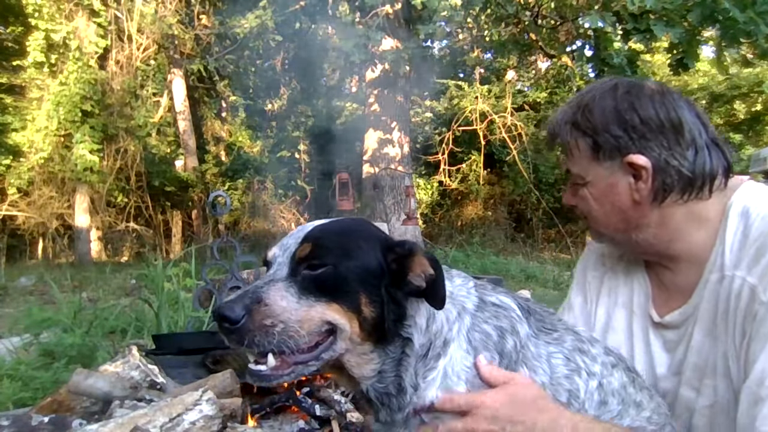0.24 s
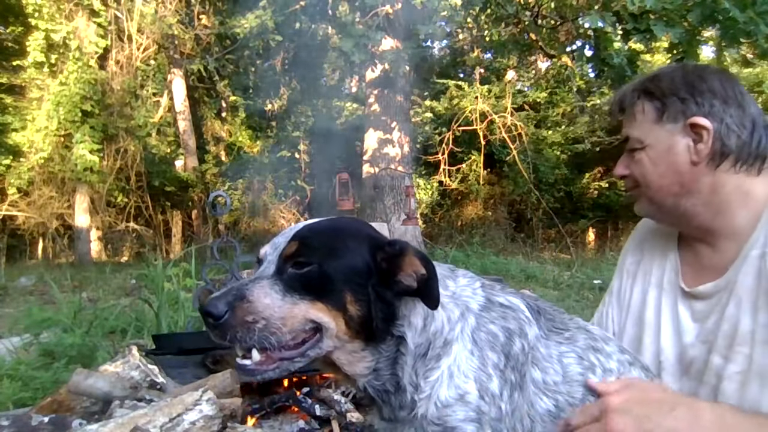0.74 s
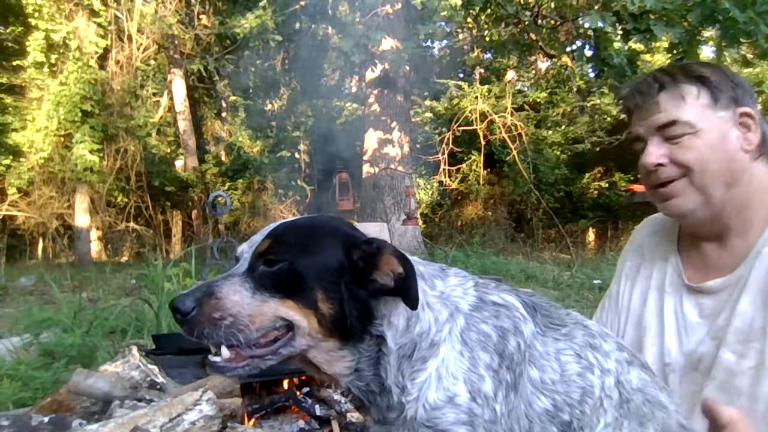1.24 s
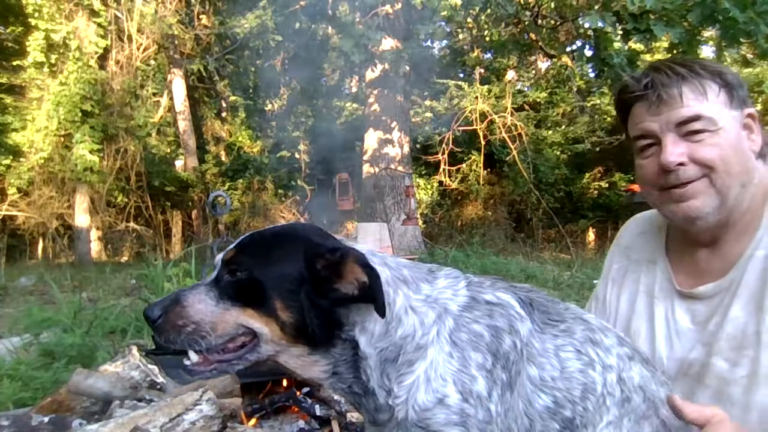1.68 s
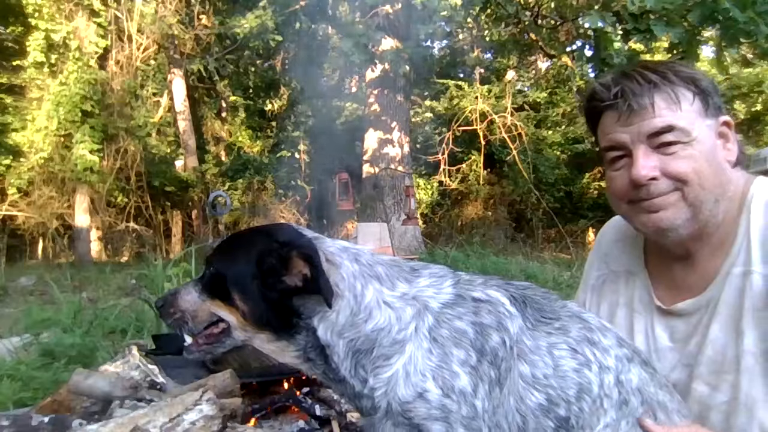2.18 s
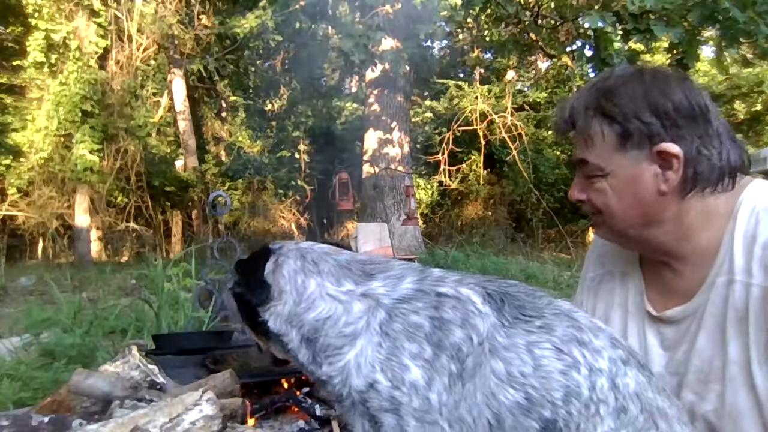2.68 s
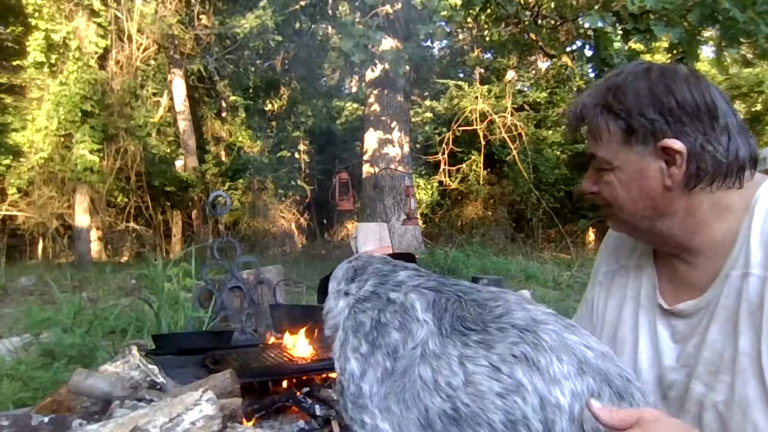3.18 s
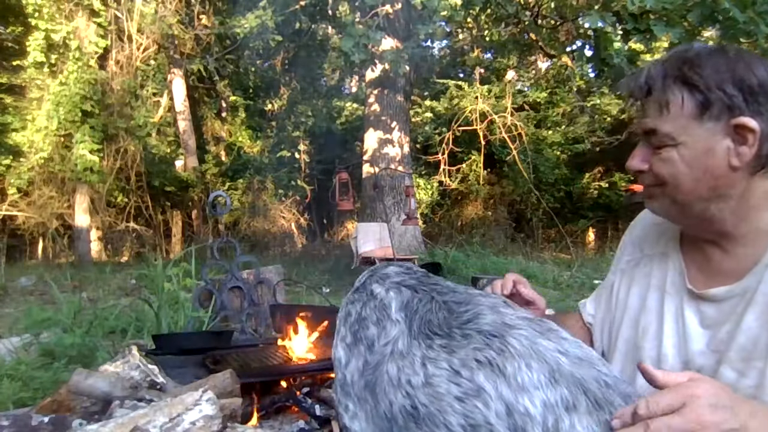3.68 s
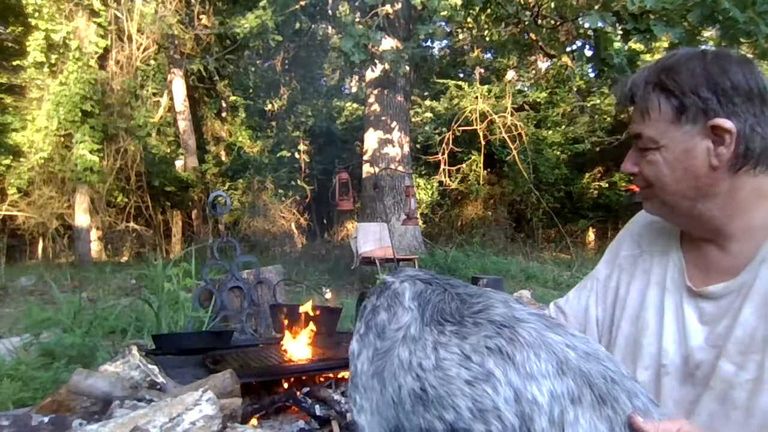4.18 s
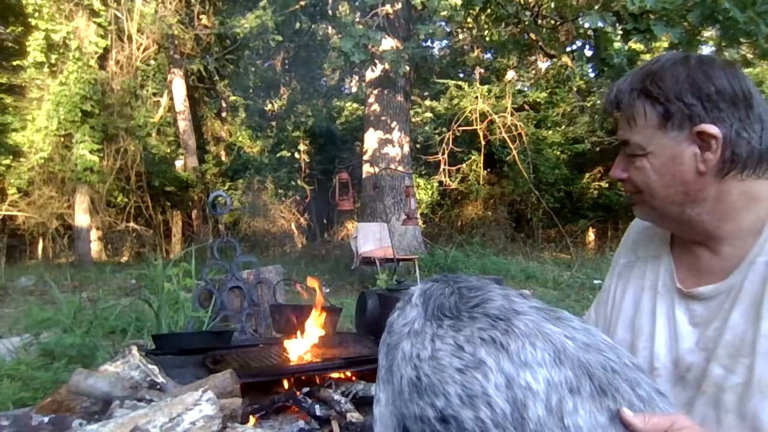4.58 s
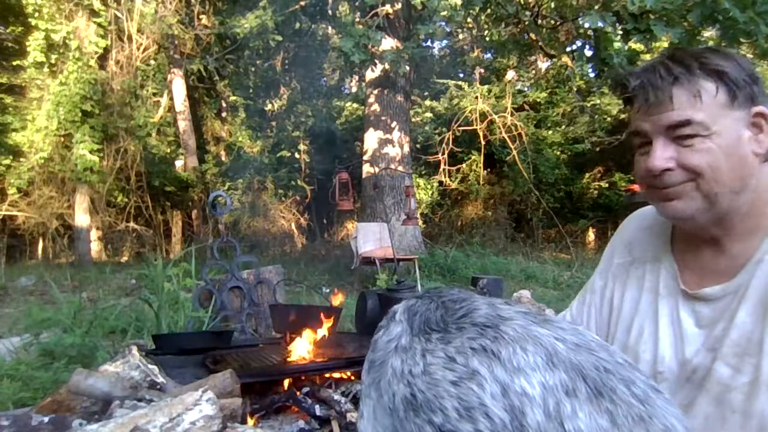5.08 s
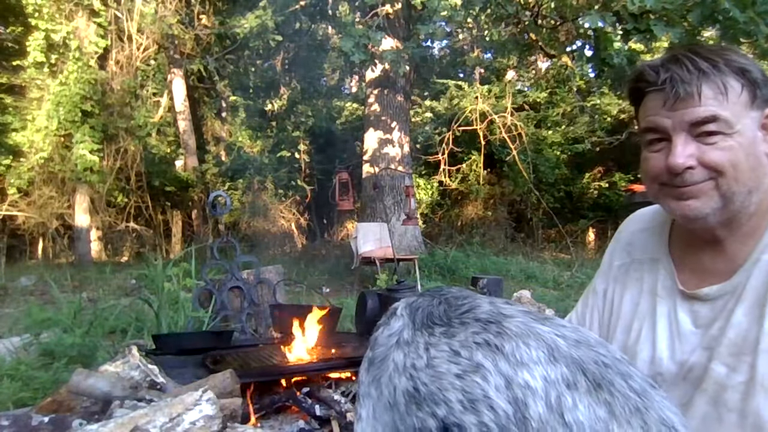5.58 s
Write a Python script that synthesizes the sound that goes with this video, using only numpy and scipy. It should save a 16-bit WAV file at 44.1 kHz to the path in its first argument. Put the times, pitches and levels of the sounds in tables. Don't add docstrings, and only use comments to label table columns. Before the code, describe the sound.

Close stereo pickup beside a small wood fire at the edge of trees. Continuous cricket hiss and fast pulsing insect buzz fill the top. Sparse snaps grow into a cluster of strong crackles, with fur and cloth rustling softly. Then comes a faint, wavering, echoing howl from far off, with one short hoarse bark, a sharp exploding pop, and another hoarse bark. Small crackles continue to the end.

```python
import sys
import numpy as np
from scipy import signal
from scipy.io import wavfile
from scipy.ndimage import uniform_filter1d

SR = 44100
rng = np.random.default_rng(int(sys.argv[2]) if len(sys.argv) > 2 else 0)


def undo_db(level):
    steps = np.asarray(level, float) / 20
    return 10 ** steps


def put_to_file(sound):
    columns = np.atleast_2d(sound).T
    safe = np.clip(columns, -1, 1)
    whole_steps = np.round(safe * 32767)
    wavfile.write(sys.argv[1], SR, whole_steps.astype(np.int16))


N = 257540
TIME = np.arange(N) / SR


def evened(x):
    return x / np.sqrt(np.mean(x ** 2) + 1e-20)


def read(points, hz):
    f, value = np.transpose(points)
    return np.interp(np.log(hz + 1), np.log(f + 1), value)


def over_time(points):
    return np.interp(TIME, *np.transpose(points))


def add(mix, start_s, sound):
    part = mix[..., round(start_s * SR):][..., :sound.shape[-1]]
    part += sound[..., :part.shape[-1]]


def resonate(x, hz, width_hz):
    turn = np.exp(2j * np.pi * hz * np.arange(x.shape[-1]) / SR)
    r = np.exp(-np.pi * width_hz / SR)
    smooth = signal.lfilter([(1 - r) ** 2], [1, -2 * r, r * r], x / turn)
    return 2 * (turn * smooth).real


def wander(count, rate_hz):
    size = max(int(SR / rate_hz), 2)
    once = uniform_filter1d(rng.standard_normal(count), size)
    return evened(uniform_filter1d(once, size))


def placed(x, lag, pan_db):
    return np.array([x, np.roll(x, lag)]) * undo_db(np.array([[pan_db / 2], [-pan_db / 2]]))


# pitch in Hz, likeness (1 is identical).
LIKENESS = [(30, .88), (80, .93), (200, .96), (500, .85), (1000, .6), (2400, 0), (8000, .1), (15000, .28)]


def noise(colour, patchy_db, size=512):
    frames, hz = 4 * N // size + 5, np.fft.rfftfreq(size, 1 / SR)
    a, b, c, d, patches = rng.standard_normal((frames, len(hz), 5)).T
    patches = uniform_filter1d(patches, 12, 0)
    patches = evened(uniform_filter1d(patches, 14, 1))
    same = np.clip(read(LIKENESS, hz), -1, 1)[:, None]
    left = a + 1j * b
    right = same * left + np.sqrt(1 - same ** 2) * (c + 1j * d)
    z = np.array([left, right]) * undo_db(read(colour, hz)[:, None] + patchy_db * patches)
    return evened(signal.istft(z, nperseg=size, noverlap=3 * size // 4)[1][:, :N])


def trees(x, decays, gap_s):
    hz, t, z = signal.stft(rng.standard_normal((2, 2 * SR)), SR, nperseg=256)
    fading = z * undo_db(-60 * t / read(decays, hz)[:, None])
    tail = signal.istft(fading, SR, nperseg=256)[1]
    tail = tail * np.clip(np.arange(tail.shape[1]) / SR / gap_s, 0, 1)
    low_pass = signal.butter(2, 1500, fs=SR, output="sos")
    tail[1] += 0.9 * signal.sosfilt(low_pass, tail[0] - tail[1])
    return signal.fftconvolve(x[None], tail / np.linalg.norm(tail[0]), axes=1)[:, :N]


def cycles(hz, jitter):
    return np.cumsum(hz * (1 + jitter * wander(len(hz), 90))) / SR


def voice(turns, levels_db, shimmer_db, fade):
    out = np.zeros(len(turns))
    for k, level_db in enumerate(levels_db, 1):
        strength = np.sqrt(2) * undo_db(level_db + shimmer_db * wander(len(turns), 84))
        out += strength * np.cos(2 * np.pi * k * turns)
    return out * signal.windows.tukey(len(turns), fade)


# pitch in Hz, level in dB per Hz.
FLAME_COLOUR = [(12, -34), (20, 4), (146, -0.5), (460, -13), (518, -13.5), (718, -20), (867, -19),
                (1200, -26), (1560, -56), (2640, -120)]


def flames():
    steady_db, gust_db, gust_s, gust_width_s = -59.5, 9, 1.917, 0.15
    gust = np.exp(-((TIME - gust_s) / gust_width_s) ** 2)
    lumps_db = 2.6 * wander(N, 30)
    level_db = steady_db + gust_db * gust + lumps_db
    return undo_db(level_db) * noise(FLAME_COLOUR, patchy_db=-2.0, size=2048)


# pitch in Hz, level in dB per Hz.
AIR_COLOUR = [(250, -36), (500, -9), (1000, -7.5), (2500, -6.5), (4000, -1.5), (5500, 2.5), (8500, -5),
              (10000, -6), (12500, -5), (15700, -11.5), (16050, -35)]


def air():
    level_db = -60 + 0.98 * wander(N, 2.2)
    return undo_db(level_db) * noise(AIR_COLOUR, patchy_db=0.5)


# time in seconds, level in dB.
CRICKET_LEVEL = [(0.0, -54.5), (0.5, -53.5), (3.59, -53), (4.83, -54), (5.84, -53)]
# pitch in Hz, width in Hz, level in dB.
CRICKET_WINGS = [(6673, 370, -7.5), (6985, 260, -6.5), (7170, 1000, -5)]


def crickets():
    clicks_per_s = 2500
    struck = rng.random((2, N)) < clicks_per_s / SR
    size = undo_db(3.5 * rng.exponential(1, (2, N)).clip(0, 4))
    teeth = struck * size * rng.choice([-1., 1.], (2, N))
    chorus = evened(sum(undo_db(db) * resonate(teeth, hz, width) for hz, width, db in CRICKET_WINGS))
    level_db = over_time(CRICKET_LEVEL) + 0.69 * wander(N, 7.7)
    return undo_db(level_db) * (chorus + 0.059 * chorus[::-1])


# time in seconds, level in dB.
BUZZ_LEVEL = [(0.1, -65), (0.7, -58.5), (2.8, -61.5), (4.0, -58.5), (5.84, -59)]
# pitch in Hz, level in dB per Hz.
BUZZ_COLOUR = [(8000, -25.5), (11000, -14), (13000, -4.5), (14500, 1.5), (15700, 3), (16050, -32.5)]
# share of the stroke done (0 to 1), level in dB.
WING_STROKE = [(0, 0), (.16, .5), (.26, -6.5), (.5, -7), (.7, -3), (1, 0)]


def bush_cricket():
    first_stroke, strokes_per_s, tiring_per_s2 = .25, 24.17, .166
    stroke = (first_stroke + strokes_per_s * TIME - tiring_per_s2 * TIME ** 2 / 2) % 1
    level_db = over_time(BUZZ_LEVEL) + np.interp(stroke, *np.transpose(WING_STROKE))
    return undo_db(level_db + 6.0) * noise(BUZZ_COLOUR, patchy_db=1.9, size=256)


# start in seconds, length in seconds, level in dB, centre in Hz.
RUSTLES = [(0.262, 0.055, -60.5, 640), (0.515, 0.051, -64.5, 815), (1.173, 0.047, -55, 2330),
           (1.77, 0.033, -42.5, 1389), (1.8, 0.034, -55, 1600), (1.885, 0.094, -58.5, 780),
           (1.99, 0.041, -53, 1600), (2.368, 0.1, -59, 990), (2.653, 0.1, -56.5, 1790),
           (2.658, 0.069, -58.5, 457), (3.449, 0.062, -62.5, 3000), (5.536, 0.036, -62, 3000),
           (5.804, 0.043, -63, 2520)]
# start in seconds, level in dB.
FLAME_PUFFS = [(0.41, -58.5), (1.896, -41.5), (2, -44.5), (2.093, -58), (3.968, -54), (5.3, -63)]


def rustles():
    out = np.zeros(N)
    puff_s, puff_hz = 0.06, 200
    low_puffs = [(start_s, puff_s, db, puff_hz) for start_s, db in FLAME_PUFFS]
    for start_s, length_s, db, hz in list(RUSTLES) + low_puffs:
        puff = evened(resonate(rng.standard_normal(4 * 2048), hz, 1.1 * hz))
        puff = puff[:round(length_s * SR)]
        add(out, start_s, undo_db(db) * puff * np.hanning(len(puff)))
    return placed(out, lag=2, pan_db=-2.0)


# start in seconds, knock in dB, crunch in dB, snap over the crunch in dB.
CRACKLES = [(0.5027, -66, -50, 18), (.759, -54, -40.5, 8), (.96, -58, -49, 7), (1.198, -34.5, -55.5, 25.5),
            (1.3471, -25, -24.5, 2), (1.5006, -38, -20.5, 1.5), (1.585, -17, -18.5, 7.5),
            (1.621, -64, -61, 17), (1.657, -57, -42.5, 14), (1.795, -13.5, -16, 2.5), (1.888, -61, -46, 7),
            (1.995, -17, -22.5, 3), (2.517, -42.5, -36.5, 1.5), (3.271, -44.5, -26.5, 6.5),
            (3.954, -48, -46, 0), (4.624, -43, -39.5, 6), (4.741, -43, -44.5, 13), (5.01, -49, -61, 16.5),
            (5.563, -52, -38, 6.5)]


def crackles():
    out, t = np.zeros(N), np.arange(600) / SR
    crunch_band = signal.butter(2, (3200, 7500), "band", fs=SR, output="sos")
    snap_band = signal.butter(2, (7000, 16000), "band", fs=SR, output="sos")
    u = t / 0.00108
    late = 1.7 * np.maximum(u - .9, 0)
    for start_s, knock_db, crunch_db, sharp_db in CRACKLES:
        burst = rng.standard_normal(len(t))
        knock_hz = min(400 - 43.5 * knock_db, 3000)
        flex = burst * u * np.exp(1 - u)
        thud = resonate(flex, 650, 1200)
        knock = resonate(flex, knock_hz, 2.17 * knock_hz) + 0.27 * thud
        fibres = burst * late * np.exp(1 - late)
        crunch = signal.sosfilt(crunch_band, fibres)
        snap = signal.sosfilt(snap_band, fibres)
        parts = (knock_db, knock), (crunch_db, crunch), (crunch_db + sharp_db, snap)
        add(out, start_s, sum(undo_db(db) * part / abs(part).max() for db, part in parts))
    return out


# pitch in Hz, time to fade by 60 dB in seconds.
FAR_TREES = [(200, 0.33), (500, 0.96), (1000, 2.08), (2000, 1.5), (5000, 0.97)]
# start in seconds, length in seconds, level in dB, from Hz, to Hz.
HOWL_NOTES = [
    (1.41, .035, -69, 914, 913),
    (1.655, .05, -71, 917, 890),
    (2.015, 0.15, -66.5, 662, 662),
    (2.238, .15, -67, 960, 975),
    (2.425, 0.15, -56, 909, 959),
    (2.536, 0.26, -56.5, 1050, 1030),
    (2.76, 0.53, -61, 879, 859),
    (3.28, 0.4, -60.5, 861, 823),
    (3.721, 0.49, -65, 813.4, 809),
]
# pitch in Hz, level in dB.
HOWL_COLOUR = [(660, -15), (830, -15), (950, -9), (1050, -4), (1330, 0), (2150, 0), (2500, -22),
               (3200, -20)]


def howl():
    far = np.zeros(N)
    fall_db, third_db = -9, -7
    for start_s, length_s, db, from_hz, to_hz in HOWL_NOTES:
        u = np.arange(0, length_s, 1 / SR) / length_s
        hz = from_hz + (to_hz - from_hz) * u
        levels_db = [db + fall_db * u + read(HOWL_COLOUR, k * hz) for k in (1, 2, 3)]
        levels_db[2] = levels_db[2] + third_db
        add(far, start_s, voice(cycles(hz, jitter=.014), levels_db, shimmer_db=5.0, fade=.4))
    direct = placed(far, lag=3, pan_db=0.5)
    return undo_db(1) * direct + undo_db(-4.5) * trees(far, FAR_TREES, gap_s=0.06)


# pitch in Hz, level in dB.
DOG_MOUTH = [(300, -14), (380, 1.5), (450, -1.5), (630, 8), (760, -7.5), (835, 2), (1000, -14),
             (1800, -25.5)]
# pitch in Hz, width in Hz, level in dB.
DOG_THROAT = [(636, 220, 6.5), (953, 160, 7), (1310, 220, 5), (1690, 240, 1.5), (2580, 1100, -14.5)]


def syllable(rows):
    s, pitch, effort = np.transpose(rows)
    t = np.arange(s[0], s[-1], 1 / SR)
    hz, db = np.interp(t, s, pitch), np.interp(t, s, effort)
    turns = cycles(hz, jitter=0.0091)
    puffs = (0.61 + np.exp(-(turns % 1) / 0.65)) * rng.standard_normal(len(t))
    halves = np.cos(3 * np.pi * turns) + .3 * np.cos(5 * np.pi * turns)
    halves = undo_db(-10.5 + 2.1 * wander(len(t), 70)) * halves
    rasp = evened(sum(undo_db(g) * resonate(puffs, f, w) for f, w, g in DOG_THROAT))
    rasp_db, growth_db, growth_s = -0.5, 21, .09
    rasp = undo_db(rasp_db + growth_db * np.minimum((t - s[0]) / growth_s - 1, 0)) * rasp
    breath_db, breath_hz = -25.5, 3840
    breath = undo_db(breath_db) * evened(resonate(puffs, breath_hz, 1.6 * breath_hz))
    rough = undo_db(db) * (halves + rasp + breath) * signal.windows.tukey(len(t), .14)
    levels_db = [db + read(DOG_MOUTH, k * hz) for k in range(1, 6)]
    return s[0], rough + voice(turns, levels_db, shimmer_db=2.26, fade=0.19)


def second_tone(start_s, length_s, db, settled_hz, throb_db):
    t = np.arange(0, length_s, 1 / SR)
    first_hz, settle_s, swell_s, swell_db = 616.3, .035, .065, -14
    throbs_per_s, throb_late_s = 29.9, .003
    throb = np.cos(2 * np.pi * throbs_per_s * (t - throb_late_s)) - 1
    level_db = db + swell_db * np.maximum(1 - t / swell_s, 0) + throb_db * throb / 2
    turns = cycles(settled_hz + (first_hz - settled_hz) * np.exp(-t / settle_s), jitter=.012)
    return start_s, voice(turns, [level_db], shimmer_db=1.2, fade=0.12)


# time in seconds, pitch in Hz, effort in dB.
BARK_FOLDS = [
    [(2.825, 228, -61.5), (2.842, 281.7, -49), (2.857, 316, -38), (2.868, 320, -42)],
    [(2.858, 343, -48.5), (2.882, 386.4, -32.5), (2.92, 446.4, -29.5), (2.945, 416.9, -32),
     (2.99, 413, -35), (3.022, 400, -37.5), (3.045, 220, -38.5)],
    [(4.452, 342, -36), (4.468, 366.4, -40.5), (4.492, 395.3, -33.5), (4.528, 444.2, -31),
     (4.595, 445.5, -31.5), (4.604, 400, -45.5), (4.63, 200, -40)],
]
# start in seconds, length in seconds, level in dB, settled pitch
# in Hz, throb depth in dB.
BARK_SECOND = [
    (2.872, 0.14, -21.5, 467, 3),
    (4.48, 0.132, -20.5, 495.7, 14.5),
]
# delay in seconds, level in dB.
TRUNK_ECHOES = [(.035, -11.5), (.068, -15), (.105, -18.5), (.14, -26.5)]


def barks():
    dog = np.zeros(N)
    for rows in BARK_FOLDS:
        add(dog, *syllable(rows))
    for row in BARK_SECOND:
        add(dog, *second_tone(*row))
    near = dog + sum(undo_db(db) * np.roll(dog, round(delay_s * SR)) for delay_s, db in TRUNK_ECHOES)
    return placed(near, lag=9, pan_db=0.1) + undo_db(-13.0) * trees(dog, FAR_TREES, gap_s=0.016)


POP_S, POP_DB = 3.6992, 4.5
# delay in seconds, pitch in Hz, level in dB, time to fade by 60 dB
# in seconds.
POP_MODES = [(-.003, 5800, -24, .03), (0.0001, 3100, 3, 0.0041), (.0, 1160, -7, 0.0049),
             (0.0014, 5280, -5, 0.0065), (.0008, 6690, -7, 0.0078), (.003, 14500, -9, .003),
             (0.0042, 5900, -16, .01), (0.0004, 4200, -8, .006), (0.0026, 8300, -10.5, 0.005),
             (.0, 520, -10, .009), (0.0008, 280, -19, 0.012)]


def pop():
    out, t = np.zeros((2, N)), np.arange(3000) / SR
    for delay_s, hz, db, t60_s in POP_MODES:
        onset = np.clip(t / 0.00055, 0, 1)
        ring = undo_db(db - 60 * t / t60_s) * np.sin(-2 * np.pi * hz * t) * onset
        add(out, POP_S + delay_s, placed(ring, lag=-int(hz > 4000), pan_db=0.0))
    spray = undo_db(-15 - 60 * t / 0.028) * rng.standard_normal((2, len(t)))
    add(out, POP_S, spray)
    return undo_db(POP_DB) * out


# pitch in Hz, time to fade by 60 dB in seconds.
NEAR_TREES = [(300, 0.089), (1500, 0.38), (3000, 0.48), (8000, 0.34), (15000, 0.19)]


def fire_echo(small):
    jolt = np.zeros(N)
    add(jolt, POP_S, undo_db(POP_DB + 18.5) * np.array([1., -1.]))
    shock = resonate(jolt, 3800, 7100)
    return undo_db(-18) * trees(undo_db(-13.5) * small + shock, NEAR_TREES, gap_s=.004)


def scene():
    background = flames() + air() + crickets() + bush_cricket()
    small = crackles()
    logs = placed(small, lag=3, pan_db=.6)
    fire = logs + pop() + fire_echo(small)
    return background + rustles() + fire + howl() + barks()


def roll_off(x):
    return signal.sosfilt(signal.butter(12, 16050, fs=SR, output="sos"), x)


def record(dry):
    taps = signal.firwin(255, 16600, fs=SR)[None]
    loud = np.clip(signal.oaconvolve(dry, taps, "same"), -1, 1)
    return roll_off(loud)


dry = scene()
out = record(dry)
put_to_file(out)
```